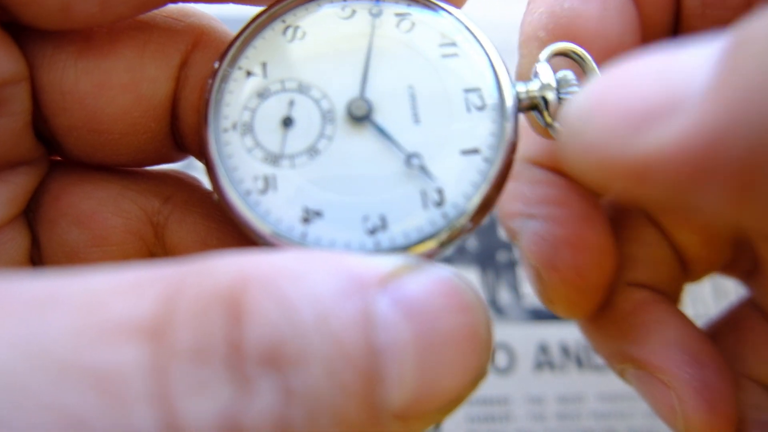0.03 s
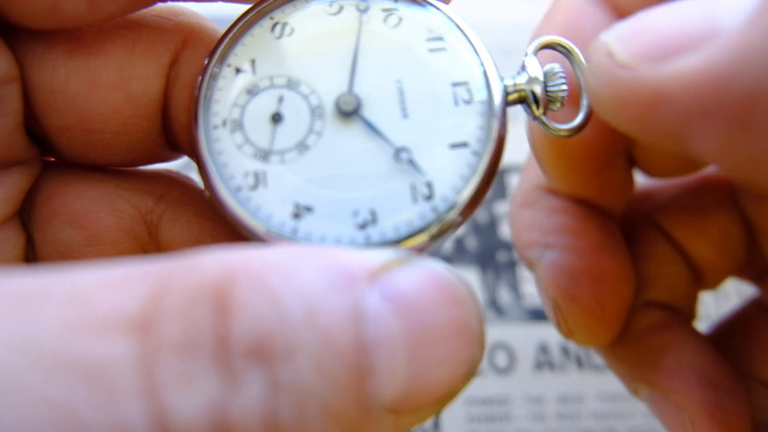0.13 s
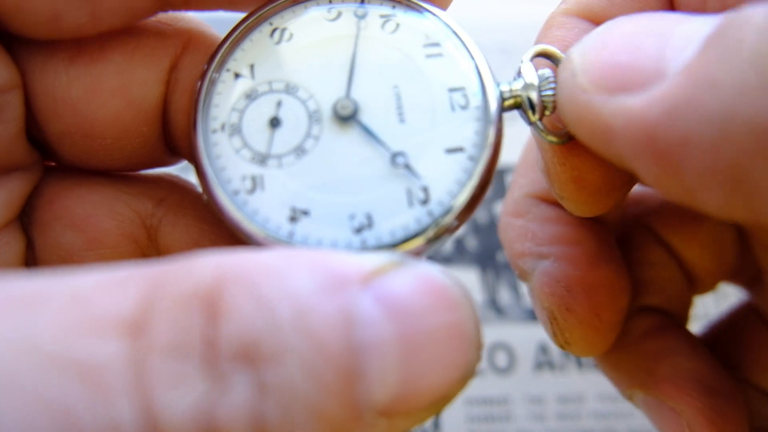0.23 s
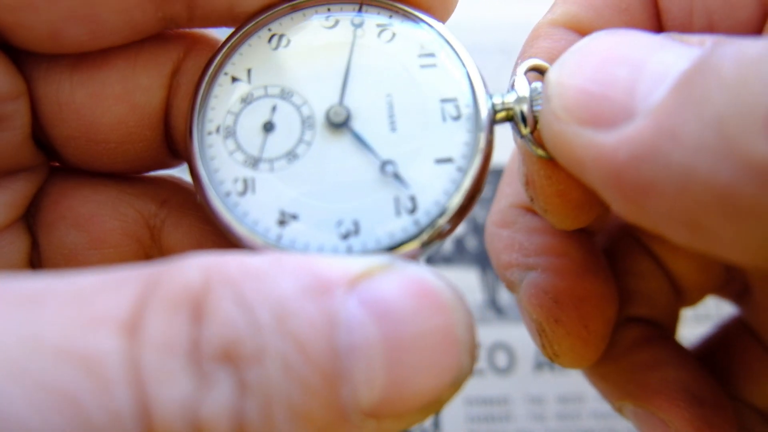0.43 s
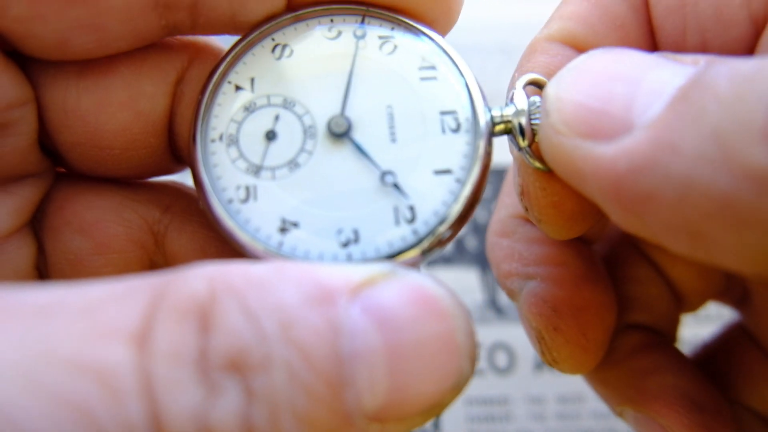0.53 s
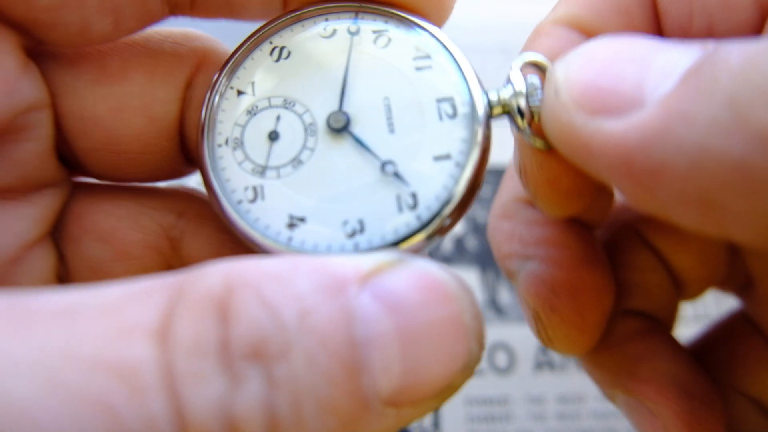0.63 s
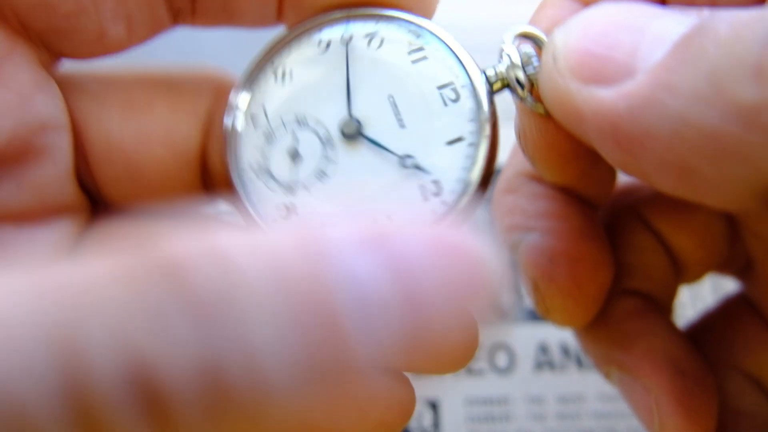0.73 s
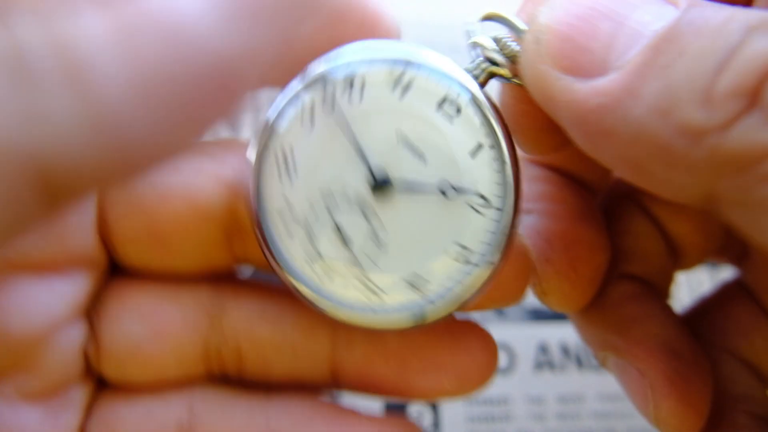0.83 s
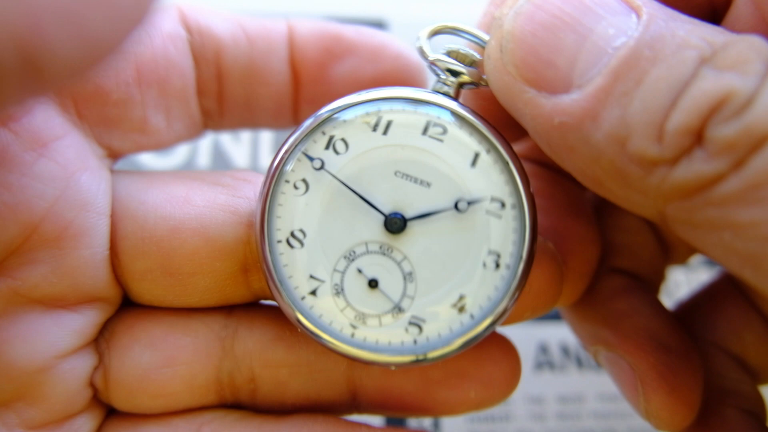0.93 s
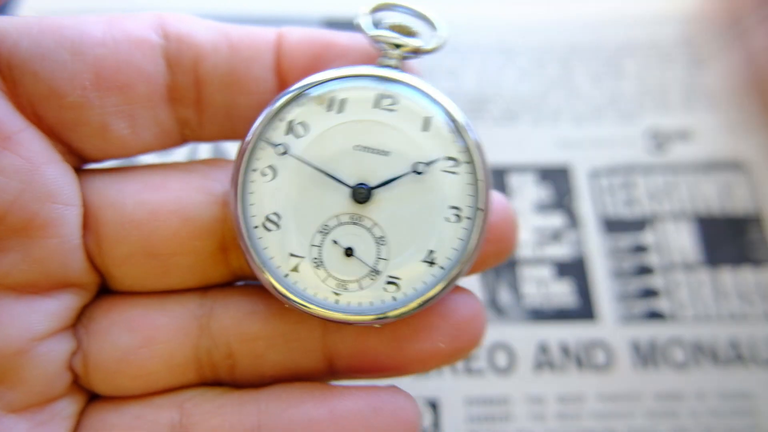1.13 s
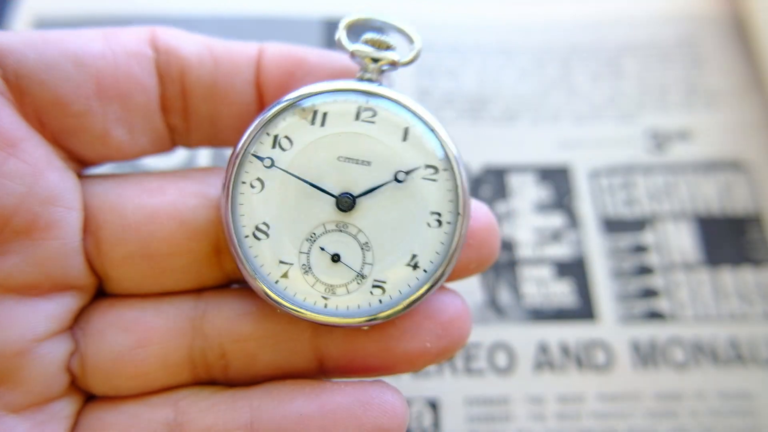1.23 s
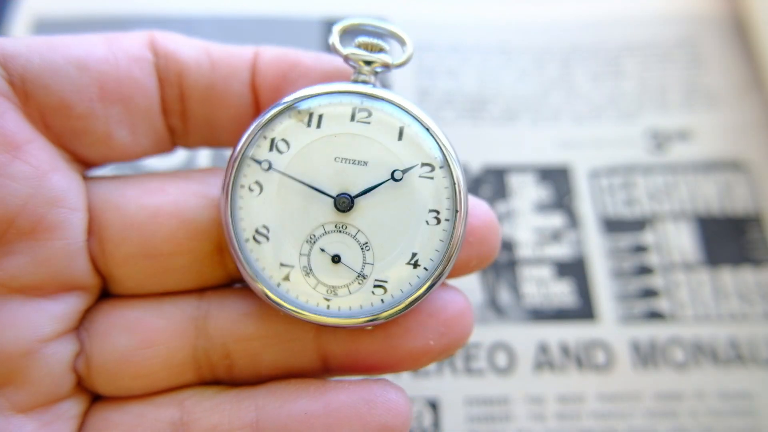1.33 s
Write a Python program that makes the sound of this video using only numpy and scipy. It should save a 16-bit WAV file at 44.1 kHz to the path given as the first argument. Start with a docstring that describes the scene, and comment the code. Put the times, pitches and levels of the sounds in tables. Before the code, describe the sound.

A pocket watch crown is pushed in with one sharp, bright metallic click at about 0.24 seconds, very short and damped by the hand. A faint gritty fingernail graze comes at 0.03 and tiny slips at 0.18. A brief, quiet small-room reflection follows. Steady low hum and soft hiss run throughout, with very faint clicks near 0.68 and 1.34 seconds. Close stereo microphone.

```python
"""Fingers push in the crown of a pocket watch, heard close up in a quiet room.
Shaped random spectra give the steady hum and hiss throughout; at 0.03 s resonant noise gives a fingernail's graze.
From 0.18 s small slips, then one sharp snap at 0.24 s, are smooth blows ringing the damped modes of the case.
Dense treble scatter follows each click at once; from 11 ms later the walls return it as sparse taps
and single echoes. Three fainter clicks come at about 0.68 s and 1.34 s."""
import sys
import numpy as np
from scipy import signal
from scipy.io import wavfile
from scipy.ndimage import uniform_filter1d

SR = 44100
rng = np.random.default_rng(int(sys.argv[2]) if len(sys.argv) > 2 else 0)


def generate_wav(signal):
    """Clip the signal to [-1, 1] and save it as 16-bit WAV at the path in sys.argv[1]."""
    frames = np.transpose(np.atleast_2d(signal))
    scaled = np.clip(frames, -1, 1) * 32767
    pcm = np.round(scaled).astype(np.int16)
    wavfile.write(sys.argv[1], SR, pcm)


N = 61739  # samples, 1.4 s


def amp(db):
    """Level law: decibels to amplitude gain."""
    return 10 ** (np.asarray(db) / 20)


def evened(x):
    """Normalization by mean power: scales to rms 1."""
    return x / np.sqrt(np.mean(x ** 2) + 1e-20)


def read(points, hz):
    """Linear interpolation of a table along a logarithmic frequency axis."""
    f, value = np.transpose(points)
    return np.interp(np.log(hz + 1), np.log(f + 1), value)


def highpass(x, order, cutoff_hz):
    """Butterworth high-pass: maximally flat above the cutoff."""
    sos = signal.butter(order, cutoff_hz, "high", fs=SR, output="sos")
    return signal.sosfilt(sos, x)


# Relative spectral density of the room noise: [f/Hz, level/dB]
AIR_SPECTRUM = [(12, -40), (20, -24), (38, -9), (119, -3), (145, -1), (181, -5), (316, -5), (354, -4),
                (407, -2), (888, -11), (1140, -4), (1780, -20.5), (3680, -24.5), (4000, -28),
                (15700, -42.5)]
# Fuzzy tones in the room noise: [f/Hz, width/Hz, level above the noise/dB]
HUM_TONES = [(51.3, 12.6, 9.5), (148.3, 9.2, 7.5), (220.3, 19, 6.5), (323, 20, 9), (988, 16, 8),
             (1157, 75, 3.5), (2030, 80, 5.5), (2904, 75, 7), (3660, 143, 9), (10100, 250, 5)]
# Likeness of the two channels: [f/Hz, correlation 0-1]
CHANNEL_LIKENESS = [(60, 0.29), (120, 0.46), (240, 0.54), (480, 0.31), (950, 0.78), (1890, 0.34),
                    (3770, 0.027), (7520, 0.033), (15000, 0.02)]
# Balance of the two channels: [f/Hz, left-right level/dB]
CHANNEL_LEAN = [(60, -0.5), (240, 0.5), (950, 1.5), (3770, 1.5), (15000, -0.5)]
AIR_DB, PATCHY_DB = -51.5, 1.0  # rms level; rms drift of the level in each patch


def room_air():
    """Stationary Gaussian noise: random spectra with resonance peaks, partly correlated between channels."""
    frames, hz = N // 1024 + 6, np.fft.rfftfreq(4096, 1 / SR)
    a, b, c, d, patches = rng.standard_normal((frames, 2049, 5)).T
    left, other = a + 1j * b, c + 1j * d

    # Averaging over 40 bins and 4 frames makes the patches broad and slow
    patches = uniform_filter1d(patches, size=40, axis=0)
    patches = evened(uniform_filter1d(patches, size=4, axis=1))

    hums = sum(top_db / (1 + (2 * (hz - f) / width) ** 2) for f, width, top_db in HUM_TONES)
    level_db = (read(AIR_SPECTRUM, hz) + hums)[:, None] + PATCHY_DB * patches

    same = read(CHANNEL_LIKENESS, hz)[:, None]
    right = same * left + np.sqrt(1 - same ** 2) * other
    lean = read(CHANNEL_LEAN, hz)[:, None] / 2
    spectra = np.array([left, right]) * amp(level_db) * amp([lean, -lean])
    noise = signal.istft(spectra, nperseg=4096, noverlap=3072)[1]
    return amp(AIR_DB) * evened(noise[:, 2048:N + 2048])


BRUSH_S, GRIT_RISE_S, GRIT_T60_S = 0.03, 0.00089, 0.021
GRIT_DB, GRIT_HZ, GRIT_WIDTH_HZ = -45.5, 1800, 640  # width of each of the two filter passes


def brush():
    """Resonance excited by friction: a fingernail's gritty noise, band-passed twice, decays exponentially."""
    t = np.maximum(np.arange(N) / SR - BRUSH_S, 0)
    peak = signal.iirpeak(GRIT_HZ, GRIT_HZ / GRIT_WIDTH_HZ, fs=SR)
    grit = signal.lfilter(*peak, rng.standard_normal(N))
    grit = signal.lfilter(*peak, grit)
    rise = np.minimum(t / GRIT_RISE_S, 1)
    return amp(GRIT_DB - 60 * t / GRIT_T60_S) * rise * evened(grit)


# Blows of the crown mechanism: [t/s, relative force level/dB, contact time/ms]
CROWN_BLOWS = [(0.1786, -47.5, 0.34), (0.1845, -44, 0.33), (0.189, -47, 0.26), (0.19, -46.5, 0.15),
               (0.1917, -48, .24), (0.2406, -13.5, 0.16), (0.681, -57.5, 0.15), (0.6855, -58, 0.16),
               (1.336, -56, 0.22)]
# Modes of the watch case damped by the hand: [f/Hz, relative level/dB, T60/s, left-right level/dB]
CASE_MODES = [(610, 5, 0.0056, -7), (1290, 5, 0.0047, -0.5), (1720, -21, 0.014, 13), (2667, 0, 0.0065, 2.5),
              (3740, -14.5, 0.0063, 4), (4360, -11, 0.0044, 5.5), (4870, -21, 0.011, 0),
              (7230, -18.5, 0.0038, -10.5), (8060, -23, 0.0059, -1), (8930, -23.5, 0.0036, -8),
              (10130, -19, 0.0032, -3), (12100, -23, 0.0069, -1), (13200, -7, 0.0027, -1),
              (14800, -3, 0.0034, 4)]
THIN_HZ = 340  # a small object radiates little bass


def crown():
    """Modal excitation: the acceleration of each smooth blow rings the damped modes of the case."""
    t, blows = np.arange(N) / SR, np.zeros(N)
    for s, db, contact_ms in CROWN_BLOWS:
        width = contact_ms / 1000 / 4
        u = (t - s) / width
        # Second derivative of a Gaussian
        blows += amp(db) * (u ** 2 - 1) * np.exp(-0.5 * u ** 2) / (width * SR)

    t, ring = t[:2000], 0
    for hz, db, t60, pan_db in CASE_MODES:
        pan = np.array([[pan_db / 2], [-pan_db / 2]])
        ring = ring + amp(db - 60 * t / t60 + pan) * np.sin(2 * np.pi * hz * t)
    rung = signal.fftconvolve(blows[None], ring, axes=1)[:, :N]
    return highpass(rung, 2, THIN_HZ)


HAND_DB, HAND_T60_S, HAND_HZ = 1, 0.008, 6500


def hand(x):
    """Diffuse scattering: fingers and table return dense treble reflections, independent in each channel."""
    t = np.arange(1000) / SR
    taps = rng.standard_normal((2, 1000)) * amp(-60 * t / HAND_T60_S)
    taps = highpass(taps / np.linalg.norm(taps[0]), 4, HAND_HZ)
    return amp(HAND_DB) * signal.fftconvolve(x, taps, axes=1)[:, :N]


# Reverberation time of the room: [f/Hz, T60/s]
WALL_T60 = [(1000, 0.24), (2700, 0.21), (5000, 0.18), (10000, 0.23)]
# Relative colour of the reverberation: [f/Hz, level/dB]
WALL_TINT = [(1000, 13.5), (2000, -11), (2700, -6.5), (4400, -0.5), (7000, -2), (14000, 0)]
WALL_S, WALL_RISE_S, WALL_DB = 0.011, 0.001, -16


def walls(x):
    """Reverberation: sparse taps of random sign follow a gap, each band decaying at its own rate."""
    size = SR // 2
    taps = np.zeros((2, size))
    slots = np.arange(0, size - 20, 20)  # one tap at random in every 20 samples
    at = slots + rng.integers(0, 20, (2, len(slots)))
    np.put_along_axis(taps, at, rng.choice([-1., 1.], at.shape), 1)

    hz, t, z = signal.stft(taps, SR, nperseg=128)
    z *= amp(read(WALL_TINT, hz)[:, None] - 60 * t / read(WALL_T60, hz)[:, None])
    tail = signal.istft(z, SR, nperseg=128)[1][:, :size]
    tail = tail * np.minimum(np.arange(size) / SR / WALL_RISE_S, 1)
    tail = np.pad(tail / np.linalg.norm(tail[0]), ((0, 0), (round(WALL_S * SR), 0)))
    return amp(WALL_DB) * signal.fftconvolve(x, tail, axes=1)[:, :N]


# Single echoes from the closest surfaces: [delay t/s, left level/dB, right level/dB]
NEAR_ECHOES = [(.0132, -27, -44), (0.0153, -55, -42), (0.0153, -28, -34)]


def near_walls(x):
    """Specular reflection: the closest surfaces return delayed, weaker copies of the sound."""
    taps = np.zeros((2, SR // 20))
    for s, left_db, right_db in NEAR_ECHOES:
        taps[:, round(s * SR)] = amp([left_db, right_db])
    return signal.fftconvolve(x, taps, axes=1)[:, :N]


def scene():
    """Superposition: room noise, graze, clicks and their reflections add linearly."""
    background = room_air() + brush()
    clicks = crown()
    clicks = clicks + hand(clicks)
    return background + clicks + walls(clicks) + near_walls(clicks)


EDGE_HZ = 15850


def record(dry):
    """Band limitation: a linear-phase low-pass removes the treble above the edge frequency."""
    lowpass = signal.firwin(511, EDGE_HZ, window=("kaiser", 9), fs=SR)
    return signal.oaconvolve(dry, lowpass[None], "same")


dry = scene()
out = record(dry)
generate_wav(out)
```